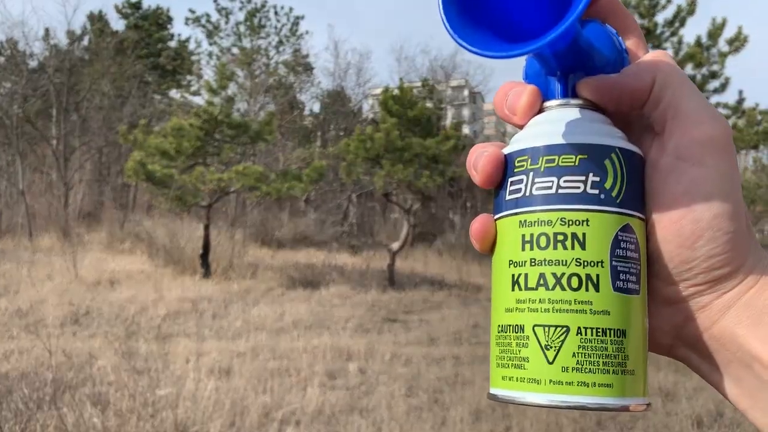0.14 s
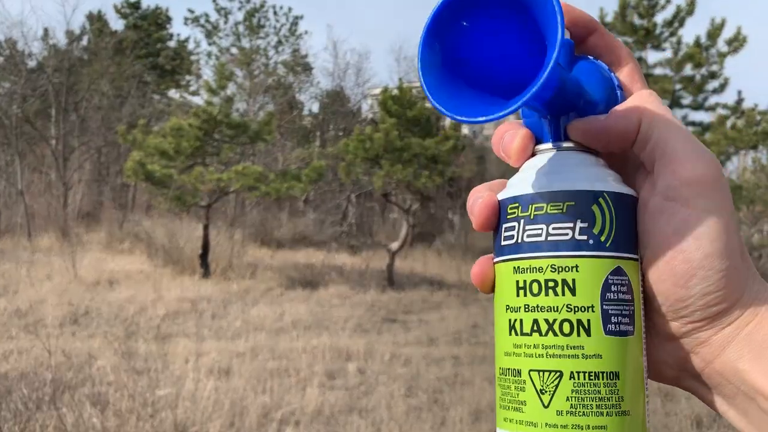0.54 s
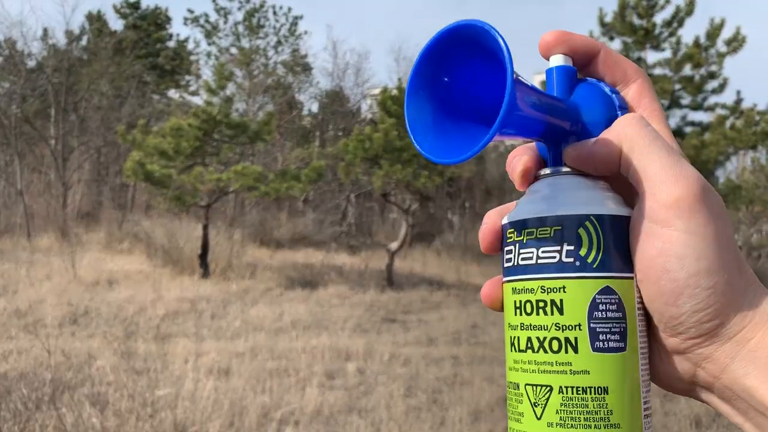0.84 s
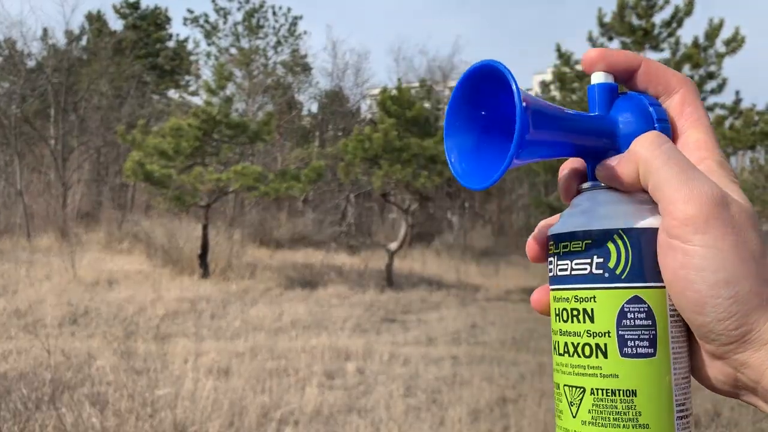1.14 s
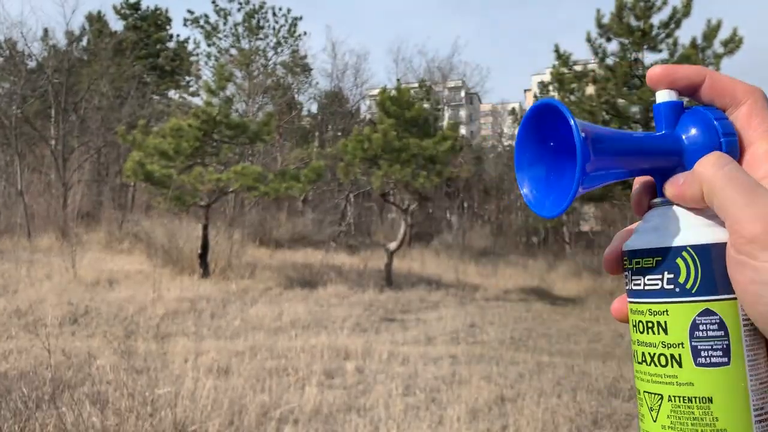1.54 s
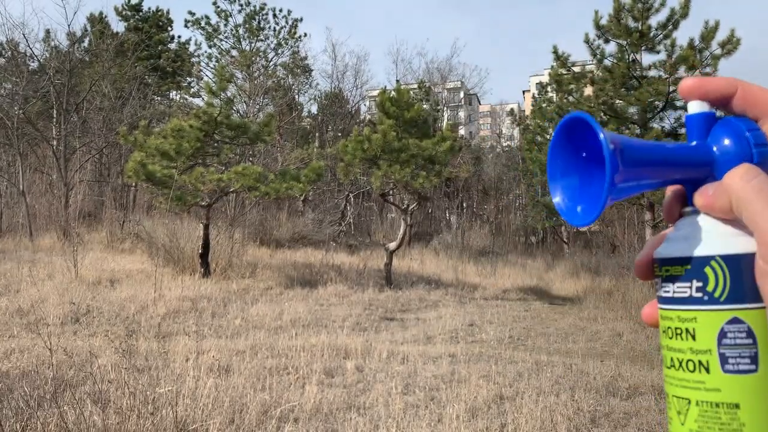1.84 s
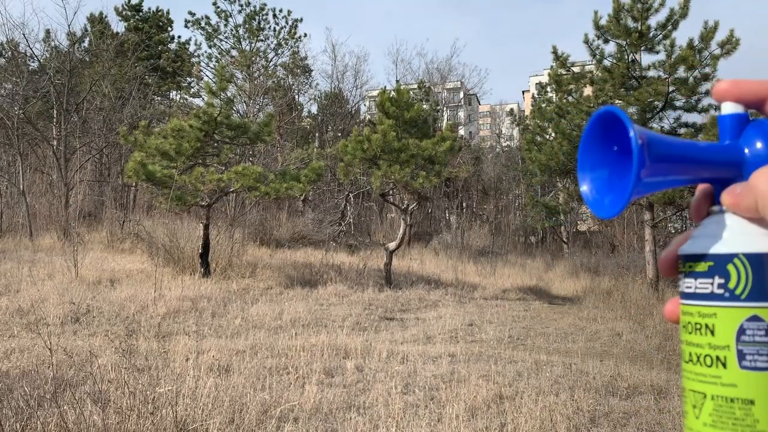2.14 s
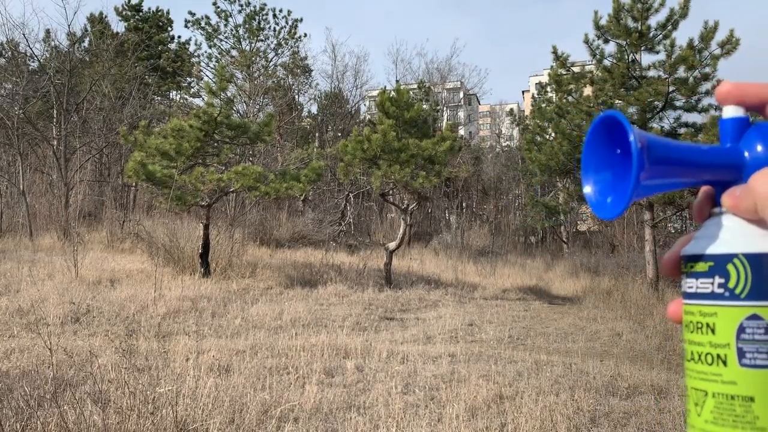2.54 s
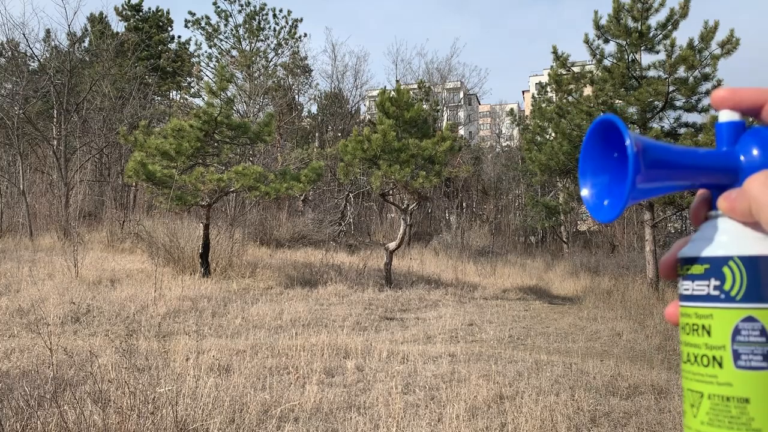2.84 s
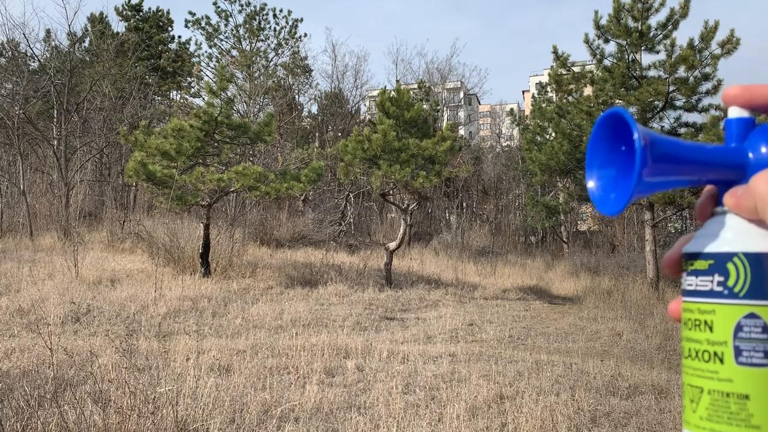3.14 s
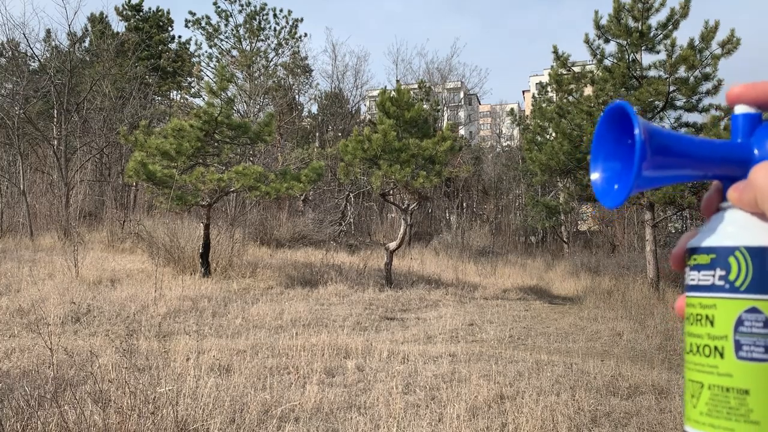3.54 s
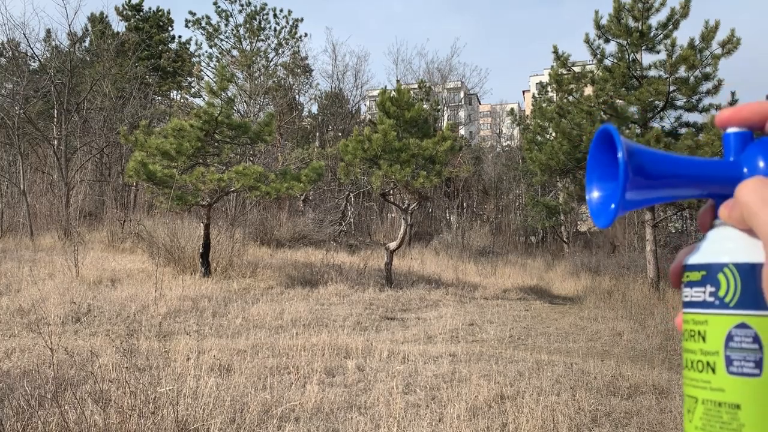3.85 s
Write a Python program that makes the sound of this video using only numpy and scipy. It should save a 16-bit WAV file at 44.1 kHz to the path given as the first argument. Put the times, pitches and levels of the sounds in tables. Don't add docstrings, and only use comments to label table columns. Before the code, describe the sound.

Loud gas horn blast cuts in after nearly four seconds of faint outdoor rumble and distant barks.

```python
import sys
import numpy as np
from scipy import signal
from scipy.fft import rfft, irfft
from scipy.io import wavfile

SR = 44100
rng = np.random.default_rng(int(sys.argv[2]) if len(sys.argv) > 2 else 0)


def generate_wav(signal):
    frames = np.transpose(np.atleast_2d(signal))
    scaled = np.clip(frames, -1, 1) * 32767
    pcm = np.round(scaled).astype(np.int16)
    wavfile.write(sys.argv[1], SR, pcm)


def nominal_scale(level):
    x = np.asarray(level, float) / 20
    return 10 ** x


N = 176400
T = np.arange(N) / SR

# (frequency [Hz], density [dB per Hz])
GAS_HISS = [(600, -14.5), (1200, -7), (2200, -2.5), (4000, -18.5), (6600, -7.5), (8500, 2.5), (11000, -2.5),
            (15000, -1.5)]


def at_hz(points, hz):
    at, value = np.transpose(points)
    return np.interp(np.log(hz), np.log(at), value)


def rms_one(x):
    return x / np.sqrt(np.mean(x ** 2) + 1e-20)


def drift(rate_hz):
    r = np.exp(-80 * np.pi * rate_hz / SR)
    white = rng.standard_normal(N // 40 + 2002)
    slow = signal.lfilter([1], [1, -2 * r, r * r], white)[2000:]
    return np.interp(np.arange(N) / 40, np.arange(len(slow)), rms_one(slow))


def butter(x, order, hz, kind):
    return signal.sosfilt(signal.butter(order, hz, kind, fs=SR, output="sos"), x)


def turning(pitch_hz):
    return 2 * np.pi * np.cumsum(pitch_hz) / SR


def coloured(spectrum):
    gain = nominal_scale(at_hz(spectrum, np.fft.rfftfreq(N, 1 / SR) + 1))
    return rms_one(irfft(rfft(rng.standard_normal(N)) * gain, N))


def pair(noise, alike):
    alike = np.clip(alike, -1, 1)
    return np.sqrt(1 + alike) * noise[0] + np.sqrt(1 - alike) * noise[1] * [[1], [-1]]


def traffic_bands():
    # (frequency [Hz], density [dB per Hz])
    air_colour = [(15, -49), (25, -18), (48, -8), (70, 2), (97, -12.5), (380, -21.5), (498, -24.5),
                  (826, -27), (2600, -55), (3380, -88), (5720, -120)]
    # (frequency [Hz], left-right correlation [-1..1])
    likeness = [(60, 0.26), (130, 0.82), (290, 0.55), (640, -0.57), (1410, -0.47), (3100, -0.59),
                (6820, -0.19), (15000, -0.08)]
    out, together = 0, drift(2.16)
    edges_hz = 20 * 2 ** np.arange(0, 7.6, .5)
    white = rng.standard_normal((2, 2, N))
    for k, (low, high) in enumerate(zip(edges_hz, edges_hz[1:])):
        hz = np.sqrt(low * high)
        band = butter(white[k % 2], 4, [low, high], "band")
        level_db = at_hz(air_colour, hz) + 1.1 * together + 1.5 * drift(11.3)
        out = out + nominal_scale(level_db) * pair(band, at_hz(likeness, hz))
    return rms_one(out)


def drone():
    centre_hz, width_hz = 63.2, 9.1
    r = np.exp(-np.pi * width_hz / SR)
    poles = [1, -2 * r * np.cos(2 * np.pi * centre_hz / SR), r * r]
    ring = signal.lfilter([1], poles, rng.standard_normal((2, N)))
    ring = butter(ring, 2, [35, 150], "band")
    return nominal_scale(-66.5 + 6.0 * drift(5.3)) * rms_one(pair(ring, 0.76))


def field():
    # (time [s], level [dB])
    traffic_db = [
        (0.0, -56.5),
        (4.0, -57),
    ]
    return nominal_scale(np.interp(T, *np.transpose(traffic_db))) * traffic_bands() + drone()


def motor():
    # (time [s], level [dB])
    motor_db = [
        (0, -75.5),
        (2.5, -89),
        (2.58, -63),
        (2.75, -76.5),
        (3.3, -76.5),
        (3.5, -69),
        (4, -68),
    ]
    level = nominal_scale(np.interp(T, *np.transpose(motor_db)) + 1.8 * drift(10.0))
    return level * np.sin(turning(266.4 + 4.0 * drift(5.0)))


def mic_hiss():
    # (frequency [Hz], density [dB per Hz])
    mic_colour = [(1500, -6), (3500, 4.5), (6000, 0), (8600, 8), (11000, 1), (13000, -6), (14000, -16),
                  (16000, -20)]
    return nominal_scale(-94) * coloured(mic_colour)


def dog():
    # (start [s], length [s], top pitch [Hz], level [dB])
    barks = [
        (0.257, 0.153, 378, -65.5),
        (1.986, 0.111, 349.7, -66.5),
    ]
    # (multiple of pitch [1], level [dB])
    bark_partials = [(2, 5), (3, -8.5), (4, -10.5), (5, -24), (6, -31)]
    scoop, echo_s, echo_db = .22, .06, -8.5
    left_lag_s, left_db = 0.00044, 5
    out, hoarse = np.zeros(N), drift(52.0)
    for start, length, hz, db in barks:
        along = np.clip((T - start) / length, 0, 1)
        below = scoop * np.clip(1 - along / 0.442, 0, 1) ** 1.52
        phase = turning(hz * (1 - below - 0.027 * along + 0.0265 * hoarse))
        voice = sum(nominal_scale(p_db) * np.sin(k * phase) for k, p_db in bark_partials)
        out += nominal_scale(db + 1.7 * hoarse) * np.sin(np.pi * along ** .8) ** 1.2 * voice
    out = out + nominal_scale(echo_db) * np.interp(T - echo_s, T, out)
    left = nominal_scale(left_db) * np.interp(T - left_lag_s, T, out)
    return np.array([left, out])


def phone_knocks():
    # (time [s], pitch [Hz], level [dB])
    knocks = [
        (1.259, 66.5, -47.5),
        (1.848, 49.6, -48),
        (1.959, 77.5, -44.5),
        (2.258, 62, -44.5),
        (2.748, 69.4, -51),
        (3.545, 67.4, -42),
        (3.585, 109.5, -44),
    ]
    width_s = 0.013
    return sum(nominal_scale(db) * np.exp(-((T - s) / width_s) ** 2) * np.cos(2 * np.pi * hz * (T - s))
               for s, hz, db in knocks)


def bird():
    # (start [s], length [s], pitch [Hz], level [dB])
    chirps = [
        (1.67, .04, 5300, -95),
        (3.37, .045, 5300, -90),
        (3.465, .045, 5400, -95),
    ]
    out, rough = 0, drift(300.0)
    for s, length, hz, db in chirps:
        swell = np.sin(np.pi * np.clip((T - s) / length, 0, 1))
        out = out + nominal_scale(db) * swell * rough * np.sin(2 * np.pi * hz * T)
    return out


def leak():
    # (time [s], hiss level [dB], squeak level [dB], squeak pitch [Hz])
    creep = [
        (3.62, -110, -120, 2200),
        (3.65, -90, -120, 2200),
        (3.714, -80, -103, 2270),
        (3.738, -76, -80, 3080),
        (3.76, -71, -68.5, 3050),
        (3.769, -58, -85, 3050),
    ]
    # (multiple of pitch [1], level [dB])
    squeak_partials = [(1, -9), (2, 0), (3, 5), (4, 1), (5, -3)]
    s, hiss_db, squeak_db, squeak_hz = np.transpose(creep)
    hiss_db, squeak_db = [np.interp(T, s, c, left=-200, right=-200) for c in (hiss_db, squeak_db)]
    phase = turning(np.interp(T, s, squeak_hz) * (1 + 0.0046 * drift(100.0)))
    squeak = sum(nominal_scale(db) * np.sin(k * phase) for k, db in squeak_partials)
    return nominal_scale(hiss_db) * coloured(GAS_HISS) + nominal_scale(squeak_db) * squeak


def horn():
    # (time [s], fundamental level [dB], extra treble [dB], gas hiss level [dB])
    blast = [
        (3.769, -82, 8, -73),
        (3.771, -64, 6, -27),
        (3.7962, -6.5, -7, -22.5),
        (3.807, -6, -2, -26),
        (3.818, -10.5, 4.5, -31),
        (3.836, -10, -3, -30),
        (3.872, -9, -3.5, -30.5),
        (3.93, -11, -2, -38),
        (4.0, -11.5, -9, -40),
    ]
    # (multiple of pitch [1], level [dB])
    overtones = [(2, -6.5), (3, -16), (4, -21.5), (5, -27), (6, -32.5), (7, -35.5), (8, -36.5), (9, -38.5),
                 (10, -34.5), (11, -37), (12, -37), (13, -51), (14, -44), (15, -40), (16, -44), (17, -43),
                 (18, -35.5), (19, -63), (20, -46), (21, -42), (22, -56), (23, -44)]
    sag_start_s, slap_s = 3.782, 3.8045
    s, *columns = np.transpose(blast)
    swing_db, treble_db, hiss_db = [np.interp(T, s, c, left=-200) for c in columns]

    since_sag = np.maximum(T - sag_start_s, 0)
    fast_sag_hz = 290 * np.exp(-since_sag / .024)
    slow_sag_hz = 50 * np.exp(-since_sag / .042)
    phase = turning(659.5 + fast_sag_hz + slow_sag_hz + .7 * drift(25.0))
    tone = nominal_scale(swing_db) * np.cos(phase + 1.6)

    since_slap = np.maximum(T - slap_s, 0)
    for k, db in overtones:
        later_s = .0018 * min(k, 9) * (k != 3)
        arrive_db = np.minimum(1500 * (T - slap_s - later_s), 0)
        arrive_db -= 9 / (k - 1) * np.exp(-since_slap / 0.071)
        high = np.clip((k - 2) / 7.9, .15, 1)
        colour_db = high * (treble_db + 1.2 * drift(8.0))
        tone += nominal_scale(db + arrive_db + colour_db) * np.cos(k * phase)

    hiss = coloured(GAS_HISS)
    thin = butter(hiss, 4, 6100, "high")
    full = np.exp(-since_slap / .03)
    gas = nominal_scale(hiss_db + 3.05 * drift(80.0)) * (full * hiss + (1 - full) * thin)
    return np.sqrt(2) * tone + gas


def ports(x):
    # (frequency [Hz], left minus right level [dB], left lead [rad])
    port_gap = [(700, -2, -.3), (1300, -3, -.15), (2600, -4, .5), (4000, 3, .7), (5300, -9, -1.2),
                (6600, -4, -1.4), (8000, 0, -2.4), (16000, 0, -13)]
    padded = N + SR
    hz = np.fft.rfftfreq(padded, 1 / SR)
    at, db, lead = np.transpose(port_gap)
    half = nominal_scale(np.interp(hz, at, db) / 2) * np.exp(.5j * np.interp(hz, at, lead))
    return irfft(rfft(x, padded) * np.array([half, 1 / half]), padded)[:, :N]


def scene():
    small_sounds = motor() + mic_hiss() + phone_knocks() + bird()
    return field() + dog() + ports(small_sounds + leak() + horn())


def roll_off(x):
    return signal.sosfilt(signal.butter(12, 16450, fs=SR, output="sos"), x)


def record(dry):
    # (time [s], step [dB])
    gain_steps = [
        (3.8205, -2.5),
        (3.8325, -3),
        (3.8745, -2.5),
    ]
    step_s, ceiling, cut_hz = .001, .93, 16250
    gain_db = sum(db * np.clip((T - s) / step_s, 0, 1) for s, db in gain_steps)
    driven = dry * nominal_scale(gain_db) / ceiling
    held = ceiling * np.tanh(driven + driven ** 3 / 3)
    mix = signal.sosfilt(signal.cheby2(12, 60, cut_hz, fs=SR, output="sos"), held)
    return roll_off(mix)


dry = scene()
out = record(dry)
generate_wav(out)
```